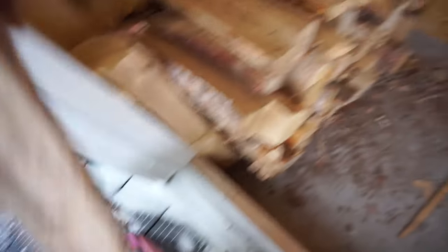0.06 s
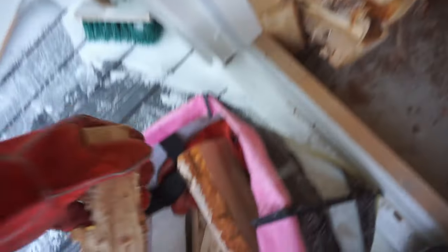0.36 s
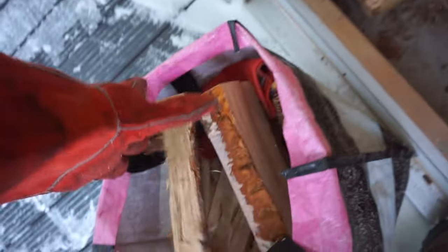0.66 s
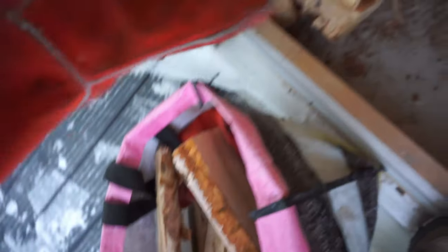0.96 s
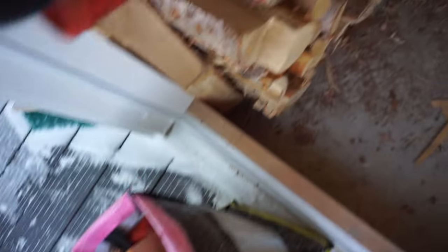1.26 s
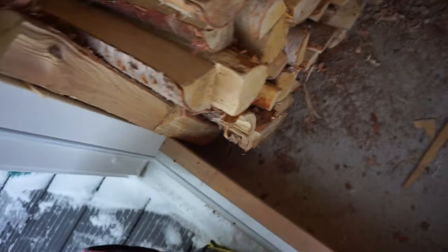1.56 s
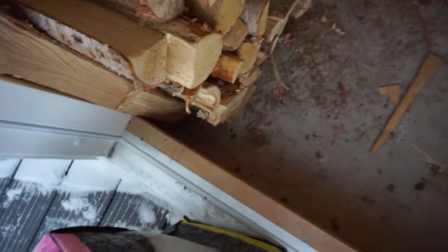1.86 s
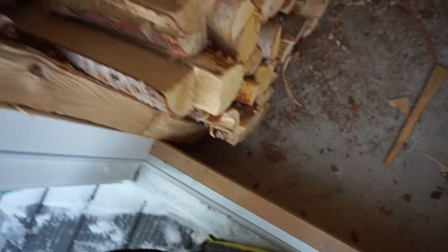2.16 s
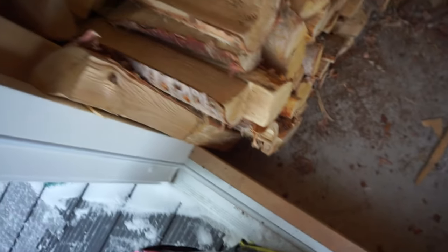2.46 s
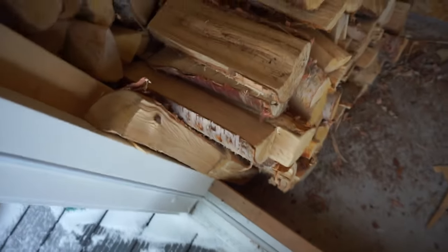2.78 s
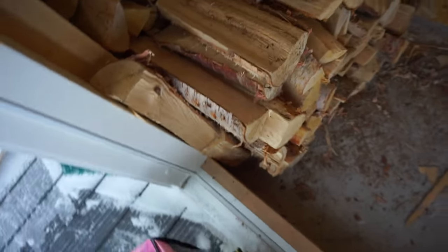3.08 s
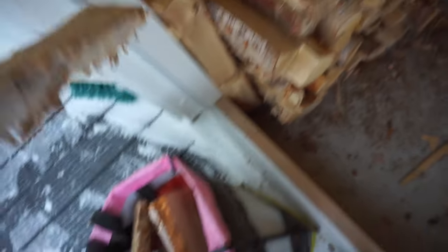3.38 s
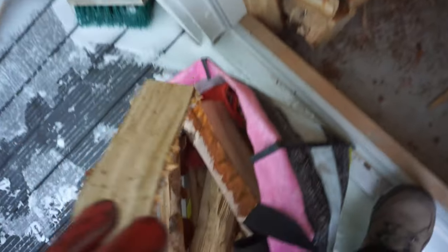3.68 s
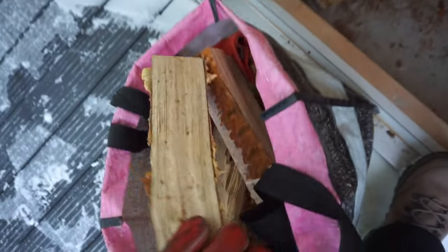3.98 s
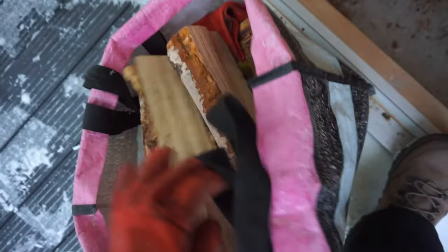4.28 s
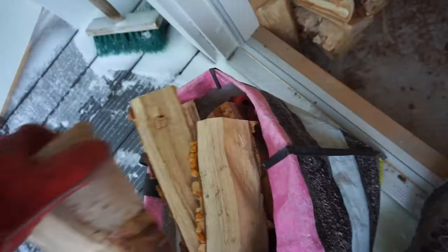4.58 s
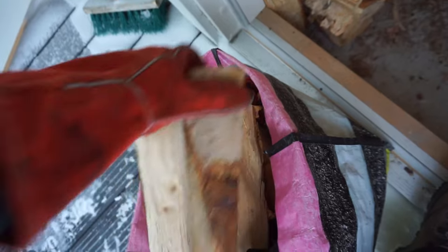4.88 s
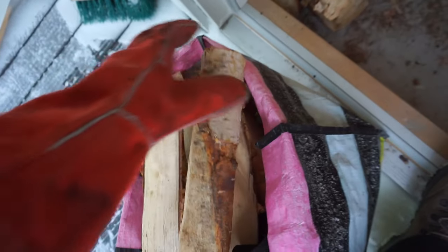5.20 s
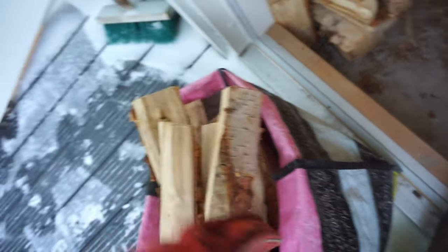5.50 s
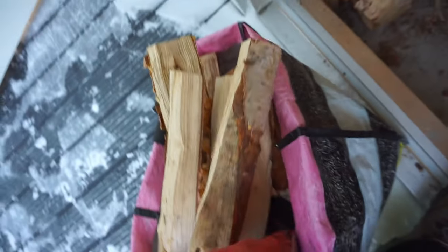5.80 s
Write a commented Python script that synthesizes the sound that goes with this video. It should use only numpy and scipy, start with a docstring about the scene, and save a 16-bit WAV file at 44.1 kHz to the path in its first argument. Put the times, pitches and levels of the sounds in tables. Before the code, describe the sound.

Dry wooden logs clatter into a bag with hollow knocks, crackling bark and rustling, in a small wood store.

```python
"""Split firewood knocks and rings as it is pulled from a stack and dropped into a fabric bag on a deck.
Each log lands with a thud that sets the boards going, then rocks until it settles. Rough faces scrape,
splinters snap, one log squeaks down its neighbour, and glove, bag and bark rustle between the blows.
The walls of a small wood store add a short echo, and a soft outdoor hush lies under it all."""
import sys
import numpy as np
from scipy import signal
from scipy.fft import rfft, irfft
from scipy.io import wavfile
from scipy.ndimage import uniform_filter1d

SR = 44100
rng = np.random.default_rng(int(sys.argv[2]) if len(sys.argv) > 2 else 0)


def pcm_store(signal):
    """Save signal as 16-bit PCM."""
    levels = np.round(np.clip(np.atleast_2d(signal), -1, 1) * 32767)
    wavfile.write(sys.argv[1], SR, levels.astype(np.int16).T)


N = 266672
TIME = np.arange(N) / SR

# Tone of the outdoor air. Each row: frequency in Hz, level in dB.
AIR_TONE = [(30, -55), (90, -48), (150, -32), (270, 7.5), (850, 8.5), (1400, 2.5), (3000, -5), (6000, -8.5),
            (10000, -13.5), (16000, -20)]
# One rough face drags over another. Each row: start and length in seconds, level in dB, pitch in Hz.
SCRAPES = [(0.031, 0.041, -52, 1700), (0.125, 0.036, -46.5, 1800), (0.486, 0.105, -40, 4800),
           (0.807, 0.11, -46, 1800), (1.795, 0.17, -39.5, 6470), (1.921, 0.021, -28.5, 9700),
           (2.557, 0.029, -33, 6500), (2.603, 0.18, -37, 6300), (2.843, 0.033, -26, 6940),
           (2.881, 0.056, -22.5, 7100), (2.915, 0.026, -39, 1330), (3.278, 0.15, -42, 5950),
           (3.814, 0.098, -44, 10300), (4.072, 0.049, -42.5, 9150), (4.203, 0.073, -38, 7340),
           (4.343, 0.12, -43.5, 8000), (4.515, 0.029, -35, 3440), (4.648, 0.14, -33.5, 1650),
           (4.944, 0.1, -33.5, 3180), (5.109, 0.091, -46, 3060), (5.59, .09, -42, 1990),
           (5.792, 0.061, -40, 2240), (6.002, 0.015, -22, 2020)]
# Modes of dry split logs. Each row: frequency in Hz, level in dB, t60 in seconds.
LOG_MODES = [(522, -19.5, 0.11), (702, -0.5, 0.03), (805, 2, 0.04), (909, -4.5, 0.063), (1015, 2, 0.045),
             (1173, 0, 0.034), (1426, 3.5, 0.033), (1682, -0.5, 0.044), (1937, 4, 0.02), (2213, 3, 0.026),
             (2296, 3.5, 0.033), (2551, 8.5, 0.026), (3500, -33, 0.12), (3660, -43, 0.033)]
# Faders for glove and logs on the move. Each row: time in seconds, rub in dB, bark crackle in dB.
HANDLING_FADERS = [(1.0, -46, -59.5), (1.29, -56.5, -84), (1.58, -40.5, -47.5), (1.73, -45, -47),
                   (1.87, -44, -39.5), (2.01, -42, -35), (2.18, -40, -42), (2.39, -88, -41.5),
                   (2.53, -43.5, -42), (2.94, -54, -46.5), (3.07, -62, -41.5), (3.33, -38, -48.5),
                   (3.53, -48.5, -56), (3.78, -49.5, -62.5), (3.99, -43.5, -39), (4.27, -43, -48.5),
                   (4.43, -45.5, -54), (4.61, -48, -56), (4.88, -38, -49), (5.05, -45.5, -52),
                   (5.31, -53, -71), (5.61, -49.5, -63), (5.86, -38.5, -46), (6.05, -37.5, -50.5)]
# Tone of the rubbing. Each row: frequency in Hz, level in dB.
RUB_TONE = [(200, -31), (450, -3), (800, 1.5), (1300, 2.5), (1900, -3.5), (2600, -3.5), (4000, -9),
            (8000, -39), (16000, -51)]
# Tone of the bark flakes. Each row: frequency in Hz, level in dB.
BARK_TONE = [(1000, -16), (2000, 3), (3500, -0.5), (5500, 1), (8000, -0.5), (11000, 0), (15500, -4.5)]
# Tone of the bag's rumble. Each row: frequency in Hz, level in dB.
BAG_TONE = [(25, -60), (90, -61), (140, -16), (200, -3.5), (350, -3.5), (550, -5), (1200, -2.5),
            (4000, -65)]
# Wood strikes wood. Each row: start in seconds, level in dB, contact pitch in Hz,
# pan as left over right in dB, extra resonance in dB.
KNOCK_HITS = [(0.278, -36, 2400, 3, 3), (0.487, -28.5, 2350, 6, 10), (0.58, -8.5, 980, 3.5, 0),
              (0.595, -21, 800, 11, 4), (0.624, -12.5, 805, 0, 3), (0.742, -30.5, 1210, -3, 14),
              (0.803, -8.5, 800, -8.5, 2.5), (0.815, -17, 1050, -2, 13), (0.924, -27, 624, -10, 3),
              (0.99, -19, 920, -4, -4), (1.274, -18.5, 1200, 2, 0), (1.306, -28.5, 770, -3, 3.5),
              (1.453, -22, 1280, 1, 1), (1.565, -16, 1230, 5, -1.5), (1.825, -27, 1430, -12, 4.5),
              (1.868, -20, 2430, -6, -4), (2.135, -9, 1770, -4, -3), (2.173, -19, 910, -1, 3),
              (2.187, -11.5, 840, -5, 7.5), (2.239, -16, 530, -10, -2), (2.678, -23.5, 2430, -10.5, 0.5),
              (2.859, -41, 960, -10, 16), (2.906, -18, 2170, -5, 4.5), (3.006, -8.5, 1260, -4, 3),
              (3.022, -27, 1490, -11, 10), (3.099, -23.5, 710, -8, 8), (3.165, -20.5, 594, -3, -5),
              (3.194, -22.5, 1140, 1, 2), (3.25, -23, 1390, 0, -10), (3.289, -23, 1340, -8, -1),
              (3.501, -26, 910, 1, 5), (3.772, -26, 977, -6, 11), (3.787, -16.5, 870, 1, 7.5),
              (4.044, -31, 2370, -0.5, 16.5), (4.091, -14.5, 990, -2, 6), (4.112, -25, 1230, -10, 4),
              (4.121, -6, 1030, 9.5, -5.5), (4.312, -20.5, 830, -7, 2.5), (4.527, -5.5, 3400, -0.5, -4.5),
              (4.675, -19, 905, 3, 10), (4.692, -10, 1680, 0.5, 6.5), (4.713, -11, 990, -3, 2.5),
              (4.734, -9, 1800, 0.5, 4.5), (4.756, -15.5, 555, 2, -7), (4.837, -21.5, 675, -2, 6.5),
              (4.947, -11, 2200, 3, -2.5), (4.968, -20, 2190, -14, -9), (4.989, -19, 1370, 2, 2),
              (5.018, -19.5, 790, 0, 3.5), (5.618, -27.5, 1180, 2, 5.5), (5.712, -31.5, 820, 1, 12),
              (5.851, -14.5, 2100, 3, 5.5), (5.866, -31.5, 800, -5, 16.5), (6.016, -11, 1370, -5, 6.5),
              (6.036, -14.5, 1550, -3, 12.5)]
# Bark and splinters break. Each row: start in seconds, level in dB, pitch in Hz, pan in dB.
SNAP_HITS = [(0.5591, -18.5, 4000, 1.5), (0.594, -24, 3460, -3), (0.7419, -8.5, 5720, -0.5),
             (1.272, -31, 2920, 0), (1.453, -37, 3160, 1), (1.5653, -21.5, 4800, 1),
             (1.5907, -27.5, 6400, -5), (1.91, -17, 3680, -1), (1.931, -34, 7500, 5),
             (2.1335, -15, 5470, -1), (2.1804, -22.5, 3750, -6), (2.4089, -19, 6740, -5),
             (2.4772, -18, 10380, 0), (2.8598, -11, 10240, -2), (2.8715, -11.5, 6500, -1),
             (3.005, -20.5, 7600, -3), (3.0268, -14.5, 4060, -3), (3.036, -15.5, 11200, 0),
             (3.0785, -21, 4720, -8), (3.1081, -21, 5260, -1.5), (3.4982, -22.5, 3490, -6),
             (3.683, -37.5, 3970, -8), (3.7722, -26.5, 4170, -2), (3.8584, -26, 4670, -4),
             (3.9274, -31.5, 9450, -4), (3.971, -36, 4570, -4), (4.0442, -21, 4630, 1),
             (4.1593, -23, 4130, 0), (4.5263, -17.5, 3530, 2), (4.6231, -20.5, 4560, -1),
             (4.96, -26, 6000, -1), (4.9686, -17, 3870, -5.5), (5.3326, -35, 4500, -2),
             (5.8506, -18.5, 3930, -6), (6.0336, -19, 4600, -1)]
# Modes of a splinter. Each row: multiple of its pitch, level in dB, t60 in seconds.
SPLINTER_MODES = [(0.6, 15, 0.0097), (.85, 6.5, 0.014), (1.002, 2, 0.038), (1.25, -44, 0.0067),
                  (1.6, -67, 0.0052), (2, -46, 0.0062)]
# A log's weight meets bag or stack. Each row: start in seconds, level in dB, push pitch in Hz,
# settling time in seconds.
LOG_LANDINGS = [(0.58, -27, 454, 0.047), (0.803, -15.5, 374, 0.17), (1.271, -36.5, 310, 0.021),
                (1.565, -35, 370, 0.014), (2.17, -14.5, 456, 0.14), (3.006, -30.5, 554, 0.098),
                (3.087, -21.5, 360, .15), (3.418, -37, 270, .12), (3.768, -26, 340, 0.17),
                (4.091, -31, 520, 0.12), (4.298, -30, 320, 0.12), (4.691, -36, 510, 0.11),
                (4.959, -31.5, 457, 0.1), (6.012, -29.5, 312, 0.088)]
# Modes of the boards under bag and stack. Each row: frequency in Hz, level in dB, t60 in seconds.
BOARD_MODES = [(83, -20, 0.19), (149.2, -17, 0.9), (180.3, 3.5, 0.1), (218.2, 4, 0.17), (255.7, 0, 0.3),
               (296.3, 5.5, 0.16), (340, 5.5, 0.086), (386, -0.5, 0.3), (436, 6, 0.19), (599, 6.5, 0.087),
               (750, 9.5, 0.035)]
# A log bounces free and rings. Each row: start in seconds, note in Hz, level in dB, t60 in seconds.
RING_NOTES = [(0.624, 1340, -26.5, 0.13), (0.741, 1115, -31, 0.15), (2.136, 1940, -16, 0.021),
              (2.859, 913, -35.5, 0.35), (3.006, 1119, -21, 0.25), (4.121, 1119, -21.5, 0.33),
              (4.839, 577, -26, 0.076), (4.947, 2268, -15.5, 0.055), (5.851, 2410, -12.5, 0.022),
              (6.008, 1103, -20.5, 0.1)]
# Bending modes of a free log. Each row: multiple of its note, level in dB, share of its t60.
BENDING_MODES = [(0.838, -12, 1), (.975, -7.5, 0.98), (0.999, 3, 0.94), (1.525, -30, .7), (1.95, -14, 0.25)]
# Path of the squeak. Each row: time in seconds, pitch in Hz, level in dB.
SQUEAK_PATH = [(0.646, 1175, -50), (0.661, 1240, -35), (0.675, 1305, -24.5), (0.685, 1360, -42),
               (0.71, 1380, -44), (0.733, 1320, -41)]
# Decay of the store's echo. Each row: frequency in Hz, t60 in seconds.
STORE_DECAY = [(100, 0.84), (300, 0.4), (1000, 0.38), (3000, 0.2), (8000, 0.053), (16000, 0.17)]
# Stereo width of two close microphones. Each row: frequency in Hz, side gain in dB.
STEREO_WIDTH = [(30, -22), (125, -28), (250, -13), (500, -10), (1000, -4), (2000, -2), (5000, -2.5),
                (16000, -2)]


def amp(db):
    """Decibels to gain."""
    return 10 ** (np.asarray(db) / 20)


def unit_rms(x):
    """Scales to rms 1."""
    return x / np.sqrt(np.mean(x ** 2) + 1e-20)


def curve_at(points, hz):
    """Reads a table on a log-frequency axis."""
    f, value = np.transpose(points)
    return np.interp(np.log(hz + 1), np.log(f), value)


def equalise(x, tone):
    """Filters by a tone curve in dB."""
    return irfft(rfft(x) * amp(curve_at(tone, np.fft.rfftfreq(N, 1 / SR))), N)


def band(x, low_hz, high_hz, order=2):
    """Band-pass, at least an octave wide."""
    high_hz = min(high_hz, .47 * SR)
    edges = [min(low_hz, high_hz / 2), high_hz]
    return signal.sosfilt(signal.butter(order, edges, "band", fs=SR, output="sos"), x)


def add(mix, s, sound, pan_db=0):
    """Places a sound in the stereo mix at s seconds; positive pan leans left."""
    part = mix[:, max(round(s * SR), 0):][:, :sound.shape[-1]]
    part += (sound * amp([[pan_db / 2], [-pan_db / 2]]))[:, :part.shape[1]]


def resonance(modes, t, detune):
    """Decaying modes of one piece, detuned since no two are the same size; each side has its own phases."""
    hz, db, t60 = np.transpose(modes)[:, :, None]
    hz = hz * (1 + detune * rng.uniform(-1.07, 1, hz.shape))
    phase = 2 * np.pi * rng.random((2, len(modes), 1))
    return (amp(db - 60 * t / t60) * np.sin(2 * np.pi * hz * t + phase)).sum(1)


def slips(per_s, spread_db):
    """Stick-slip clicks, scattered in size and between left and right."""
    size = amp(spread_db * np.minimum(rng.exponential(1, N), 4)) * (rng.random(N) < per_s / SR)
    angle = rng.uniform(-.25, .75, N) * np.pi
    return size * rng.choice([-1, 1], N) * np.array([np.cos(angle), np.sin(angle)])


def trigger(drive, response):
    """Plays a response from every sample of the drive, cut to the drive's length."""
    return signal.oaconvolve(drive, response, axes=1)[:, :drive.shape[1]]


def outdoor_hush(level_db=-48):
    """A soft, steady bed of open air."""
    return amp(level_db) * unit_rms(equalise(rng.standard_normal((2, N)), AIR_TONE))


def bark_crunch(per_s=700, spread_db=3.8, cycles=1.8, sizes=24):
    """Bark flakes of many sizes tick densely, each size at its own pitch for a few cycles."""
    out, t = np.zeros((2, N)), np.arange(512) / SR
    for hz in np.geomspace(1100, 15500, sizes):
        age = t * hz / cycles
        flake = age * np.exp(-2 * age) * np.sin(2 * np.pi * hz * t)
        when, chance, side = rng.random((3, round(per_s * N / SR)))
        strength = amp(spread_db * np.minimum(-np.log(chance), 5))
        angle = 2 * np.pi * side
        ticks = np.zeros((2, N))
        ticks[:, (when * N).astype(int)] = strength * np.array([np.cos(angle), np.cos(angle + 1)])
        out += amp(curve_at(BARK_TONE, hz)) * unit_rms(trigger(ticks, flake[None]))
    return unit_rms(out)


def settling(age, settle_s, drop_db=17.5, bend=2.1):
    """Envelope of a landed log's motion: it holds, then dies away, drop_db down at settle_s."""
    return (age >= 0) * amp(-drop_db * (np.maximum(age, 0) / settle_s) ** bend)


def handling(rub_db=-1, bark_db=1, rumble_db=-6, grind_db=-15, sag_db=-17, jostle_db=-7, flake_db=-7):
    """Glove, bark and bag rub in clumps of slips; logs jostle, shed flakes and grind as they settle."""
    times, *faders = np.transpose(HANDLING_FADERS)
    rubbing, crackling = (amp(np.interp(TIME, times, db)) for db in faders)
    weight = sum(amp(db) * settling(TIME - s, settle_s) for s, db, _, settle_s in LOG_LANDINGS)
    drift = uniform_filter1d(uniform_filter1d(rng.standard_normal(N), size=600), size=300)
    clumps = amp(2 * unit_rms(drift))
    rub = unit_rms(equalise(clumps * slips(per_s=3000, spread_db=4), RUB_TONE))
    tap = resonance(LOG_MODES, TIME[:SR // 10], detune=0.08)
    jostle = unit_rms(equalise(trigger(slips(per_s=100, spread_db=4), tap), RUB_TONE))
    crunch = unit_rms(clumps * bark_crunch())
    burst = rng.standard_normal((2, SR // 50)) * amp(-60 * TIME[:SR // 50] / 0.04)
    flakes = unit_rms(equalise(trigger(slips(per_s=32, spread_db=0), burst), BARK_TONE))
    bag = unit_rms(equalise(rng.standard_normal((2, N)), BAG_TONE))
    friction = (amp(rub_db) * rubbing + amp(grind_db) * weight) * (rub + amp(jostle_db) * jostle)
    crackle = amp(bark_db) * crackling * (crunch + amp(flake_db) * flakes)
    rumble = (amp(rumble_db) * rubbing + amp(sag_db) * weight) * bag
    return friction + crackle + rumble


def scrapes(rasp_db=-12):
    """Dense slips swell and stop as a log drags, and rasp in its modes."""
    out, friction = np.zeros((2, N)), slips(per_s=5000, spread_db=-5)
    for s, length_s, db, hz in SCRAPES:
        stroke = friction[:, round(s * SR):][:, :round(length_s * SR)]
        drag = band(stroke, hz * .5, hz * 1.17, order=1)
        drag = unit_rms(band(drag, 260, 24000))
        rasp = unit_rms(trigger(drag, resonance(LOG_MODES, TIME[:SR // 20], detune=0.047)))
        fade = signal.windows.tukey(drag.shape[1], .4)
        add(out, s, amp(db) * (drag + amp(rasp_db) * rasp) * fade)
    return out


def push(low_hz, high_hz, order=2):
    """The short pressure swing of one contact, peak 1."""
    pulse = band(signal.unit_impulse(2048), low_hz, high_hz, order)
    return pulse / abs(pulse).max()


def chatter(pulse, graze_db=-12, rebound_db=-12, lead_s=0.001586, scatter_s=.005, rebounds=3):
    """Split faces never meet flat: a ridge grazes first, the face lands, and it rebounds a few times."""
    contacts = np.zeros((2, SR // 40))
    add(contacts, 0, amp([graze_db]))
    add(contacts, lead_s, np.ones(1))
    for late, flip, lean in rng.random((rebounds, 3)):
        rebound = amp([rebound_db]) * np.sign(flip - .5)
        add(contacts, 2 * lead_s + scatter_s * late, rebound, pan_db=10 * (lean - .5))
    return signal.fftconvolve(contacts, pulse[None], axes=1)


def excite(pulse, body):
    """A pulse sets a body going; the answer has rms 1 over its first 10 ms."""
    answer = signal.fftconvolve(pulse[None], body, axes=1)[:, :body.shape[1]]
    return answer / np.sqrt(np.mean(answer[:, :round(SR / 100)] ** 2))


def knocks(body_db=-14, pile_db=-1, pile_t60=0.11, attack_s=0.003, body_low_hz=650):
    """A hard transient at contact, then the logs' short modes and the blur of the pile they touch."""
    out, t = np.zeros((2, N)), np.arange(SR // 8) / SR
    for s, db, hz, pan_db, resound_db in KNOCK_HITS:
        transient = chatter(push(hz * .5, hz * 1.288, order=3))
        pile = unit_rms(rng.standard_normal((2, len(t))) * amp(-60 * t / pile_t60))
        log = unit_rms(resonance(LOG_MODES, t, detune=0.058))
        body = (log + amp(pile_db) * pile) * (1 - np.exp(-t / attack_s))
        blow = push(min(hz * .5, body_low_hz), hz * 1.82)  # even a sharp contact reaches the low modes
        add(out, s, amp(db) * transient, pan_db)
        add(out, s, amp(db + body_db + resound_db) * excite(blow, body), pan_db)
    return out


def snaps(trim_db=-3, crack_t60=0.0065, tail_db=-16, tail_t60=0.23, buzz_db=-11,
          tear_s=0.0015, strain_db=-15, strain_s=0.003):
    """Fibres strain and tear for a few milliseconds, break in a burst, and the splinter buzzes briefly."""
    out, t = np.zeros((2, N)), np.arange(SR // 10) / SR
    age = np.maximum(t - tear_s, 0)
    attack = np.minimum(t / tear_s, 1) ** 2
    decay = amp(-60 * age / crack_t60) + amp(tail_db - 60 * age / tail_t60)
    strain = amp(strain_db) * np.exp((t - t[-1]) / strain_s)  # swells into the break
    for s, db, hz, pan_db in SNAP_HITS:
        fibres = band(rng.standard_normal((2, len(t))), hz * .5, hz * 1.17, order=1)
        fibres = unit_rms(band(fibres, 610, 23000))
        splinter = [(min(ratio * hz, SR / 2), level, t60) for ratio, level, t60 in SPLINTER_MODES]
        buzz = amp(buzz_db) * resonance(splinter, t, detune=0.108)
        add(out, s, amp(db + trim_db) * (fibres * decay + buzz) * attack, pan_db)
        add(out, s - t[-1], amp(db + trim_db) * fibres * strain, pan_db)
    return out


def thuds(push_db=-1, boards_db=-6, clack_db=-15, rock_db=-1, rock_gap_s=.027, contacts=9,
          shake_db=-27, shake_t60=0.59, sway_db=-19):
    """A soft heavy push rings the boards and shakes the floor; the log rocks and clacks until it settles."""
    out, t = np.zeros((2, N)), np.arange(SR // 3) / SR
    for s, db, hz, settle_s in LOG_LANDINGS:
        for k, (late, firmness) in enumerate(rng.uniform(-1.015, 1, (contacts, 2))):
            age = (k + 0.1993 * late) * rock_gap_s if k else 0
            gain = amp(db + (rock_db if k else 0)) * settling(age, settle_s)
            push_hz = hz * (1 + 0.23 * firmness)
            pulse = push(push_hz * 0.45, push_hz * 1.87, order=3)
            boards = excite(pulse, resonance(BOARD_MODES, t[:SR // 5], detune=0.019)[:1])
            clack = excite(push(push_hz, push_hz * 2.2), resonance(LOG_MODES, t[:SR // 16], detune=0.035))
            add(out, s + age, gain * amp(push_db) * pulse)
            add(out, s + age, gain * amp(boards_db) * boards)
            add(out, s + age, gain * amp(clack_db) * clack)
        shake = unit_rms(band(rng.standard_normal(len(t)), 42, 240)) * amp(-60 * t / shake_t60)
        sway = unit_rms(band(rng.standard_normal(len(t)), 125, 230, order=4)) * settling(t, settle_s)
        add(out, s, amp(db + shake_db) * shake + amp(db + sway_db) * sway)
    return out


def log_rings(attack_s=0.0018):
    """A log bounces free and sounds a clear note: a close pair of bending modes over weaker ones."""
    out, t = np.zeros((2, N)), np.arange(SR // 2) / SR
    for s, hz, db, t60 in RING_NOTES:
        note = sum(amp(level - 60 * t / (share * t60)) * np.sin(2 * np.pi * ratio * hz * t)
                   for ratio, level, share in BENDING_MODES)
        add(out, s, amp(db) * note * (1 - np.exp(-t / attack_s)))
    return out


def squeak(pitch_waver=0.014, level_flutter=0.27):
    """A log slides down its neighbour; stick and slip lock into a thin, unsteady note."""
    times, hz, db = np.transpose(SQUEAK_PATH)
    out, t = np.zeros((2, N)), np.arange(times[0], times[-1], 1 / SR)
    wobble = unit_rms(uniform_filter1d(rng.standard_normal(len(t)), size=200))
    cycles = np.cumsum(np.interp(t, times, hz) * (1 + pitch_waver * wobble)) / SR
    envelope = amp(np.interp(t, times, db)) * (1 + level_flutter * wobble)
    add(out, times[0], envelope * np.sin(2 * np.pi * cycles))
    return out


def store_echo(send, density=.06, predelay_s=.004):
    """Close wooden walls: sparse echoes whose treble dies first."""
    taps = rng.standard_normal((2, SR // 2)) * (rng.random((2, SR // 2)) < density)
    taps[:, :round(predelay_s * SR)] = 0
    hz, t, spectrum = signal.stft(taps, SR, nperseg=256)
    decay = amp(-60 * t / curve_at(STORE_DECAY, hz)[:, None])
    tail = signal.istft(spectrum * decay, SR, nperseg=256)[1]
    return trigger(send, tail / np.linalg.norm(tail[0]))


def scene(knock_send_db=-9, thud_send_db=-11, bark_send_db=-9):
    """All the wood, its echo in the store, and the hush of the air."""
    wood, weight = knocks(), thuds()
    bark = snaps() + scrapes() + handling()
    echo = store_echo(amp(knock_send_db) * wood + amp(thud_send_db) * weight + amp(bark_send_db) * bark)
    return outdoor_hush() + bark + wood + weight + log_rings() + squeak() + echo


def record(dry, ceiling=.8, balance_db=-0.87, low_cut_hz=42, high_cut_hz=16100):
    """Peaks are rounded off, two close microphones share the bass, and both band edges are trimmed."""
    rounded = dry / (1 + (dry / ceiling) ** 4) ** .25
    mid = rounded.mean(0)
    side = equalise((rounded[0] - rounded[1]) / 2, STEREO_WIDTH)
    pair = np.array([mid + side, mid - side]) * amp([[balance_db / 2], [-balance_db / 2]])
    pair = signal.sosfilt(signal.butter(2, low_cut_hz, "high", fs=SR, output="sos"), pair)
    high_cut = signal.firwin(511, high_cut_hz, window=("kaiser", 9), fs=SR)
    return signal.oaconvolve(pair, high_cut[None], "same")


dry = scene()
out = record(dry)
pcm_store(out)
```